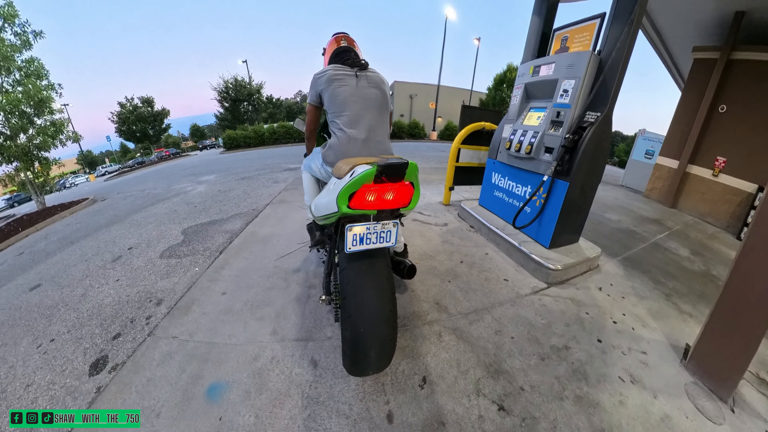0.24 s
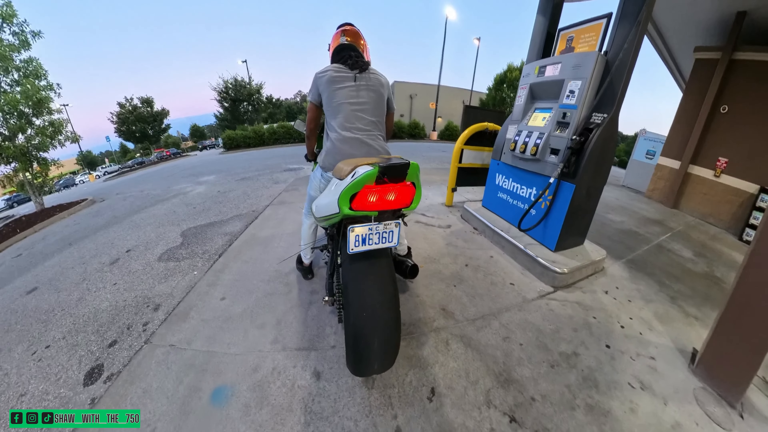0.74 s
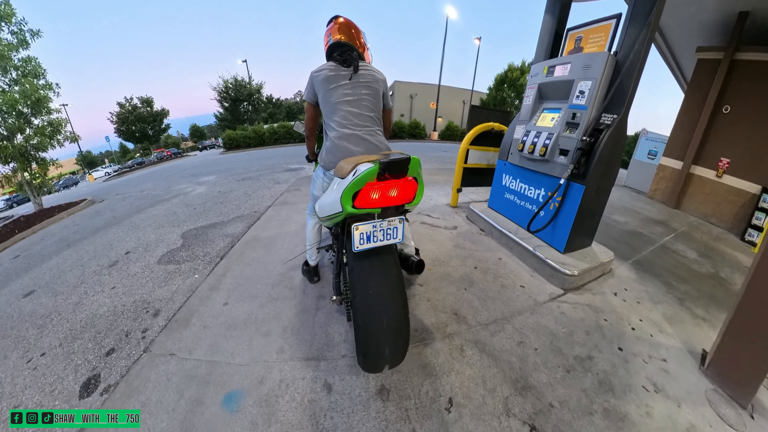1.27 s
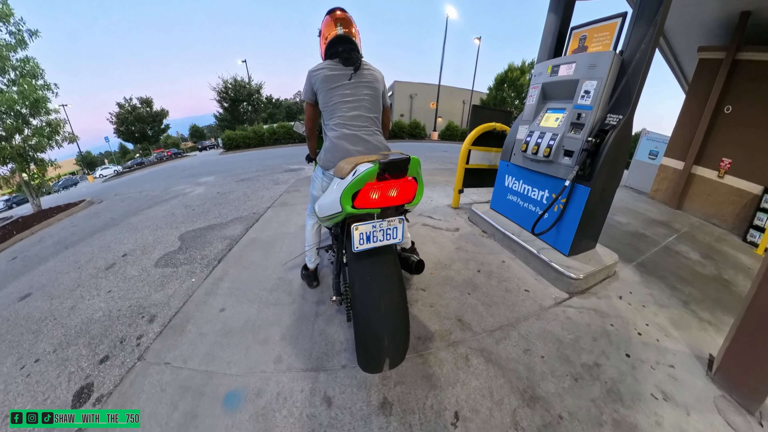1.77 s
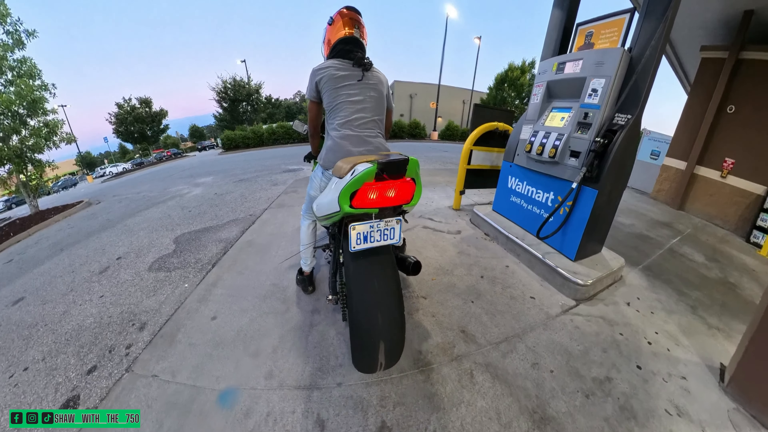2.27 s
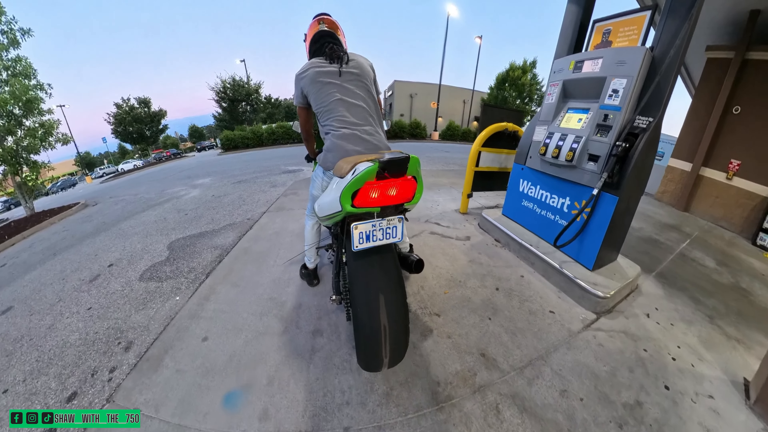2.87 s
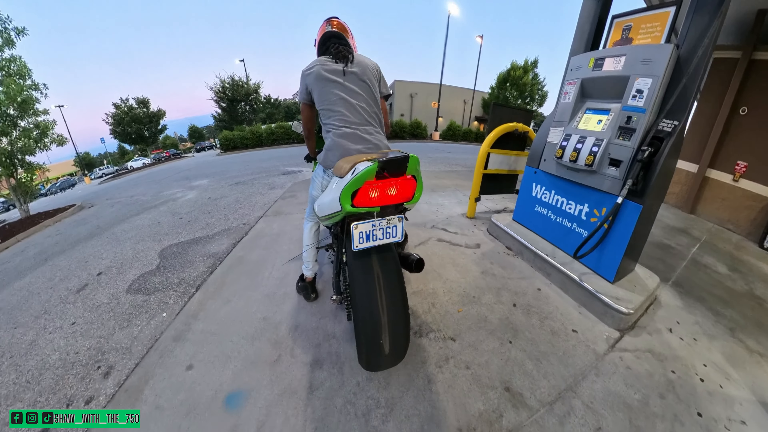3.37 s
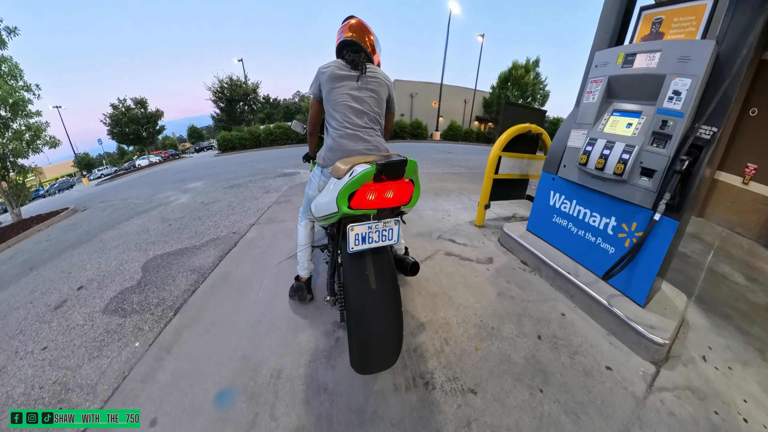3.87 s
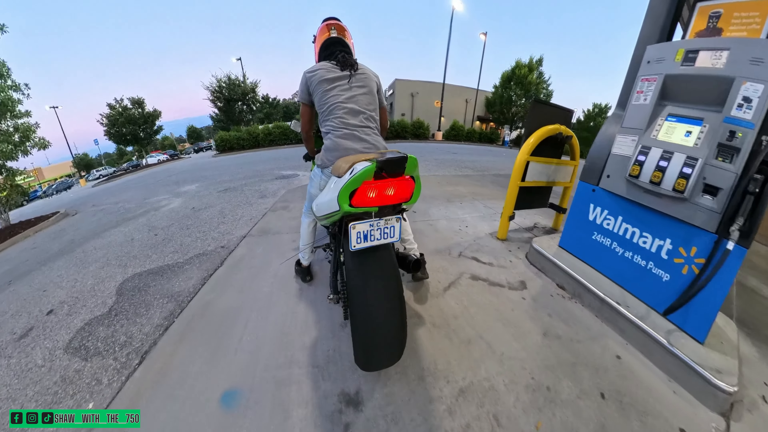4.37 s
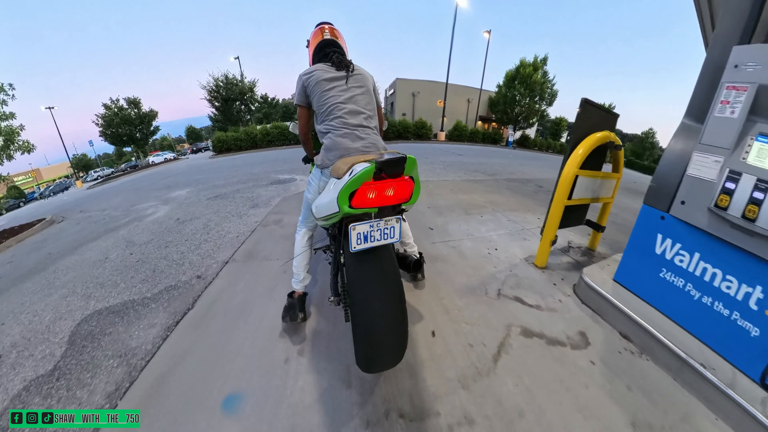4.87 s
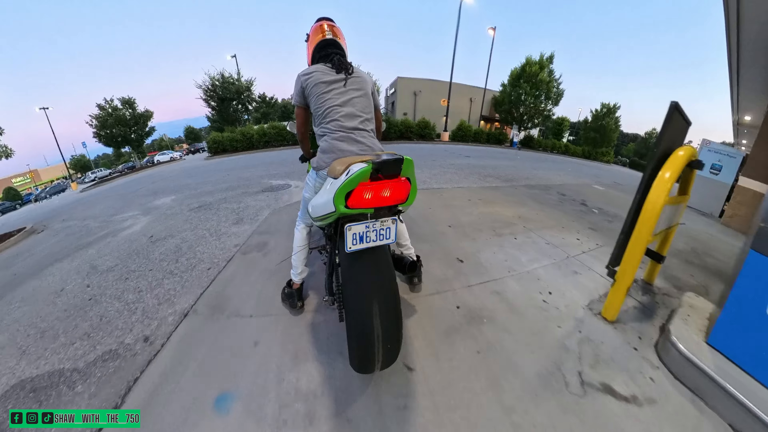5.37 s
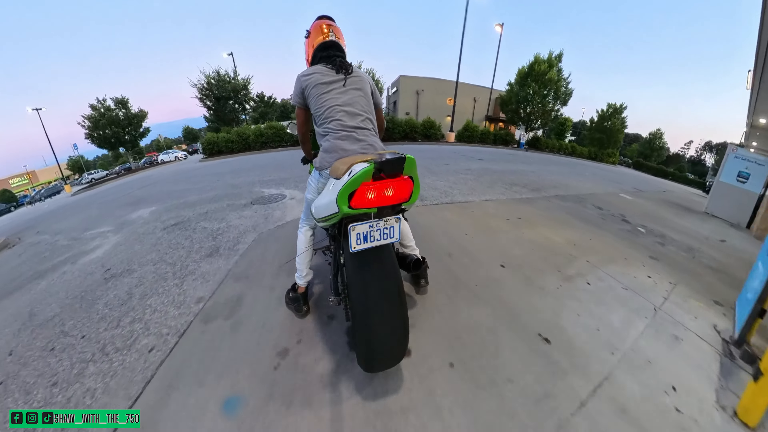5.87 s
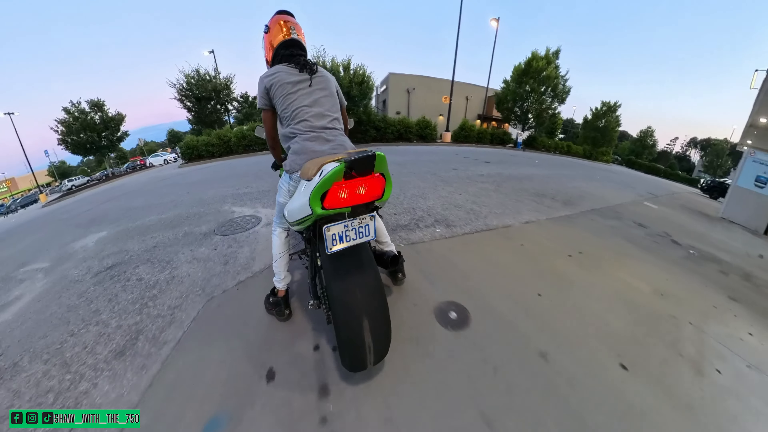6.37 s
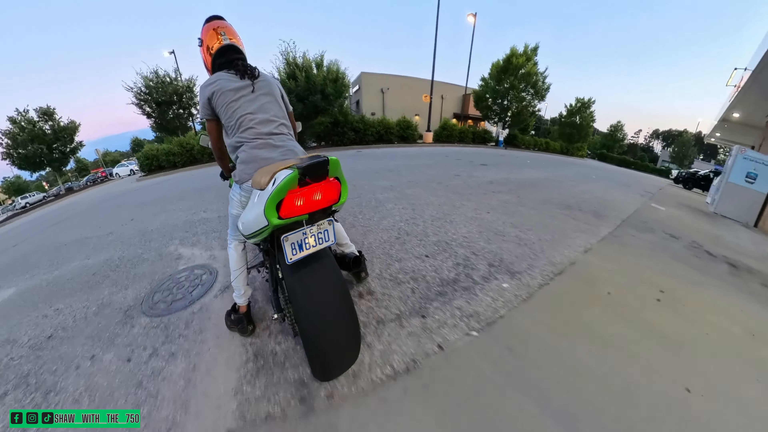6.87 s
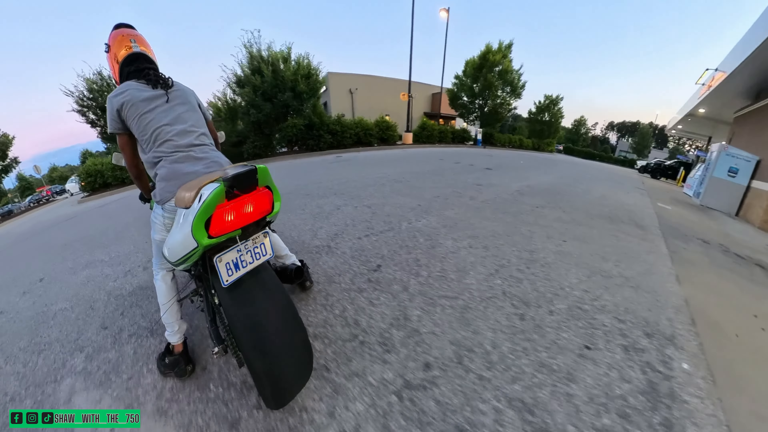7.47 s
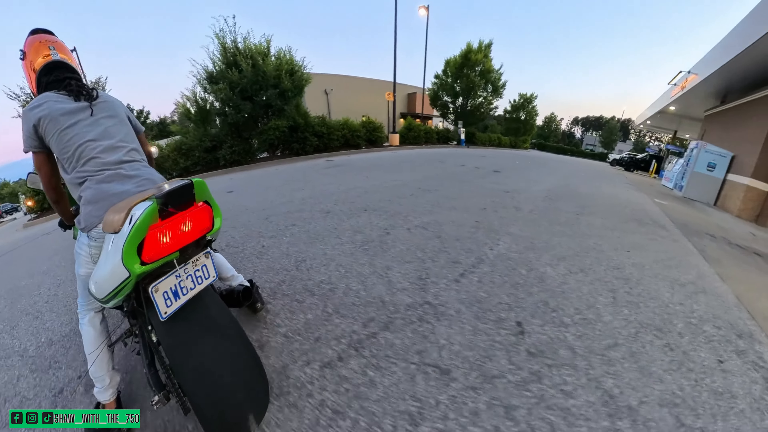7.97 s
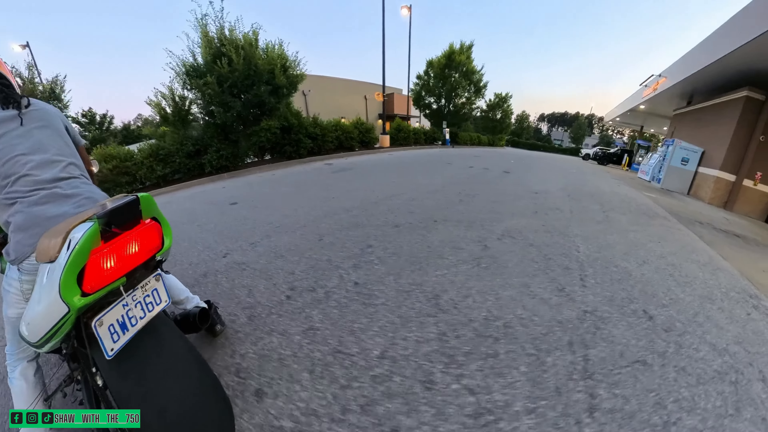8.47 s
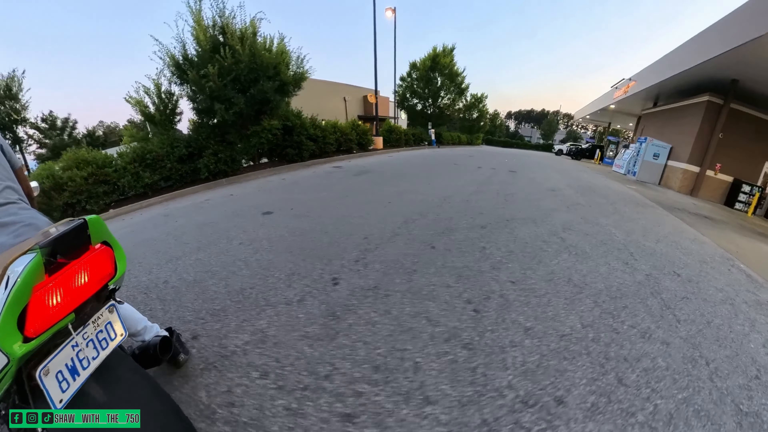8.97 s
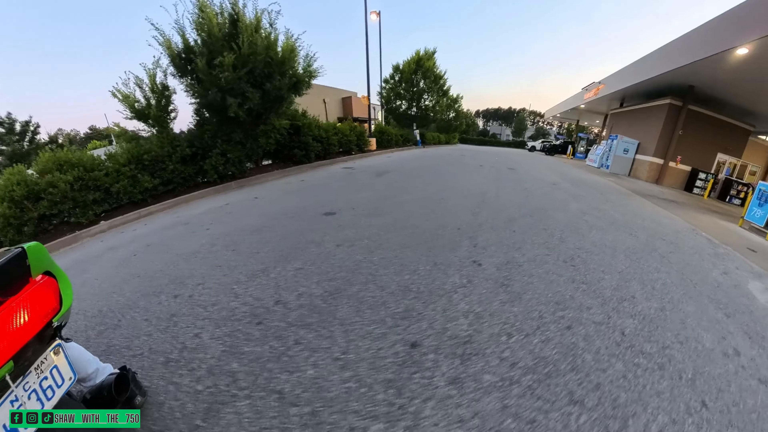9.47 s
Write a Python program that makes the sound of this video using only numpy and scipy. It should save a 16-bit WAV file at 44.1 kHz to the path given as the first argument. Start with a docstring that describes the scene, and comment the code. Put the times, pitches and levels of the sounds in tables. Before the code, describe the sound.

Close behind a motorcycle: low throaty idle, metallic gear clunk, one quick rev, then a slow, sagging, chain-knocking roll-off with two soft throttle swells.

```python
"""A four-cylinder motorcycle idles on a roofed forecourt, the microphone a fixed distance behind its tail.
Fittings clink as it clunks into gear; a blip of throttle follows and the clutch, slipping, drags the revs down.
It creeps past a fuel pump, lugging and stumbling between two gentle pulls, and rolls out from under the roof.
Throughout, firings ring the silencer, gas rasps and growls, valves and gears clatter over intake hiss and faint
open air; at low revs the slack chain knocks. Pulses and noise are coloured by resonant bodies and struck modes."""
import sys
import numpy as np
from scipy import signal
from scipy.fft import rfft, irfft
from scipy.io import wavfile
from scipy.ndimage import uniform_filter1d

SR = 44100
rng = np.random.default_rng(int(sys.argv[2]) if len(sys.argv) > 2 else 0)


def int16_out(signal):
    """Quantize to a 16-bit WAV file."""
    q = np.round(np.clip(np.atleast_2d(signal).T, -1, 1) * 32767)
    wavfile.write(sys.argv[1], SR, q.astype(np.int16))


N = 429093
TIME = np.arange(N) / SR

# speed with the throttle shut, before hunting, dragged down as the clutch bites [t/s, firing rate f/Hz]
IDLE = [(0.22, 53.85), (0.29, 52.08), (0.5, 49.92), (0.66, 43.36), (0.9, 46.39), (1.2, 47), (1.41, 43.74),
        (2.15, 40.6), (2.29, 39.33), (2.6, 36.5), (2.9, 37.53), (3.18, 35.72), (3.34, 36.95), (3.69, 37.08),
        (4.04, 32.63), (4.3, 30.26), (4.7, 28.51), (5.3, 28.84), (6.9, 30.15), (7.25, 31.99), (7.6, 31.93),
        (8.8, 37.93), (9.55, 38.65), (9.72, 42.9)]
# twists of the throttle: one blip, two pulls [t/s, rise/s, top firing rate f/Hz, fall/s, force 0-1]
TWISTS = [(1.435, 0.145, 110.5, .222, 0.9), (5.3, .672, 67, .16, 0.46), (7.581, .872, 56.1, .149, 0.17)]
# stumbles: the firings go soft for a moment, about once an engine cycle when lugging [t/s, depth/dB]
STUMBLES = [(.595, -3), (1.375, -3.5), (2.075, -3.5), (4.415, -7.5), (4.555, -6), (4.706, -3), (4.858, -8),
            (5.015, -6.5), (5.095, -3.5), (5.172, -5), (5.329, -12), (5.461, -1), (6.15, -3), (6.42, -2.5),
            (6.501, -8), (6.648, -6.5), (6.789, -7.5), (6.93, -4.5), (7.05, -5), (7.206, -3.5),
            (7.568, -3.5)]
# the four cylinders in firing order [relative strength/dB, lateness/firing periods, header pipe f/Hz]
CYLINDERS = [(7, 0.0046, 135.4), (4, -0.0058, 219.3), (5, 0.014, 180.6), (3.5, -0.0031, 198)]
# firing rates: easy walking pace; below which the chain hangs slack; where the flow turns slow to fast
CRUISE_HZ, SLACK_BELOW_HZ = 39.5, 33.7
SLOW_FLOW_HZ, FAST_FLOW_HZ = 44.4, 58
# how each voice follows the work
# [cruise level/dB, speed/(dB per octave), full throttle/dB, overrun/dB, lugging/dB]
BOOM_LAW = (-17.5, 0.5, 7.5, 0.5, -0.4)
RASP_LAW = (-33.5, 6, 1.5, -2.5, -2.5)
CLATTER_LAW = (-41, 1, 4, -2, -2)
INTAKE_LAW = (-65.5, 10.5, -19, 7, 3)

# response of pipe and silencer to one firing in slow flow [f/Hz, level/dB]
PIPE = [(18, -34), (30, -6.5), (44, 5), (60, 7.5), (76, 3), (96, -1.5), (118, 2.5), (134, -4.5), (152, 5.5),
        (188, -3), (245, -13.5), (300, -3.5), (355, -34), (650, -41.5)]
# the same once the gas flows fast [f/Hz, level/dB]
FAST_PIPE = [(25, -26.5), (42, -4.5), (57, 4.5), (68, 1.5), (92, -4), (113, -4.5), (133, -3), (165, -5),
             (183, -4.5), (198, -12.5), (225, -12), (260, -13), (285, -11), (327, -9.5), (358, -21.5),
             (395, -19.5), (450, -33), (650, -48.5)]
# standing waves that hold the sound back inside the silencer [f/Hz, width/Hz]
CHAMBERS = [(66, 57), (167, 34.2), (278, 43)]
# what passes from the headers to the tailpipe [f/Hz, level/dB]
MANIFOLD = [(70, -7), (120, 1.5), (240, 2), (340, -9)]
# breathy gas leaving the tailpipe [f/Hz, level/dB]
GAS = [(120, -1.5), (300, -3), (365, -8), (480, 1.5), (640, -9), (745, -5.5), (870, -11), (1000, -20),
       (1600, -25.5), (5000, -58)]
# the clean bark of the tailpipe at higher revs [f/Hz, level/dB]
BARK = [(180, -8), (280, 3.5), (330, 3.5), (360, -10.5), (405, 0.5), (470, 2.5), (540, -2.5), (610, -5.5),
        (680, -1.5), (770, -7.5), (880, -6.5), (1000, -16.5), (1350, -10), (2000, -26.5)]
# turbulent gas under load [f/Hz, level/dB], and the throttle force at which it is fully grown
GROWL = [(170, 1), (260, 1), (330, -1), (380, -5.5), (480, -4), (620, -5.5), (800, -15.5), (1000, -21),
         (1350, -16.5), (2000, -24)]
FULL_LOAD = .42
# echo off the fuel pump as the bike rolls past, end values held [t/s, strength 0-1, delay/s]
PUMP = [(3.0, 0.33, 0.0053), (4.1, 0.6, 0.005), (4.9, 0.36, 0.005166), (5.5, 0.4, 0.005)]

# engine cases, valve gear and gears [f/Hz, level/dB]
CASES = [(500, -12), (1000, -8), (1300, -0.5), (1600, -3), (1950, -1.5), (2300, -3.5), (3300, -5.5),
         (4300, -10.5), (5500, -18.5), (7500, -26), (10500, -39.5), (13000, -58)]
# ringing covers and heat shields [f/Hz, width/Hz, level/dB]
COVERS = [(1222, 79, -0.5), (1440, 50, -6), (1770, 49, -5), (1965, 87, -5.5), (2850, 82, -11),
          (3330, 94, -5.5), (5500, 200, -5.5)]
# colour of a bright metal tick, valve tip or chain link [f/Hz, level/dB]
TAPPETS = [(3500, -8.5), (6500, 0), (9000, -7.5), (12000, -17.5)]

# the slack chain slapping its guides [t/s, level/dB, ring f/Hz]
KNOCKS = [(4.305, -41, 1301), (4.369, -40, 1700), (4.47, -39, 1477), (4.579, -46, 1928), (4.685, -45, 1320),
          (4.727, -45, 2584), (4.762, -43, 1623), (4.799, -43, 1320), (4.883, -44, 1481),
          (4.912, -41, 1747), (4.955, -50, 1440), (5.038, -47, 1214), (5.073, -41.5, 1842),
          (5.112, -57, 1238), (5.198, -46, 2067), (5.231, -37, 1960), (5.268, -48, 1430),
          (5.355, -41, 1600), (5.385, -37, 1284), (5.414, -39.5, 1440), (5.479, -39, 1273),
          (6.305, -45, 1500), (6.392, -40, 1711), (6.422, -38, 1330), (6.557, -46, 2029),
          (6.669, -42, 1263), (6.701, -41, 1200), (6.846, -47, 1622), (6.884, -43, 1569),
          (7.088, -37.5, 1970), (7.217, -40, 2108), (7.246, -41, 1240), (7.341, -39, 1276),
          (7.371, -42, 1992), (7.436, -42, 1169), (7.532, -45, 1180)]
# colour of a chain knock [f/Hz, level/dB]
CHAIN = [(500, 6.5), (1300, -2), (2100, 1), (3500, -7.5), (5500, -19), (8500, -24), (12000, -48)]
# chain links clicking onto the sprocket [t/s, level/dB]
LINKS = [(4.731, -53), (4.763, -51), (4.911, -51), (4.956, -48), (5.232, -47), (5.388, -49), (5.509, -51),
         (6.225, -54), (6.489, -55), (6.67, -54), (6.701, -54), (6.815, -46)]

# first gear feeling its way in, then engaging [t/s, strike level/dB]
SHIFTS = [(.412, -27), (.443, -28), (.515, -31), (.545, -37), (.575, -23.5)]
# the gearbox ring [f/Hz, level/dB, t60/s]
GEARBOX = [(720, -0.5, 0.16), (681, -8, 0.11), (896, -1.5, 0.043), (1290, -20, .06)]
# loose metal fittings clinking [t/s, level/dB, centre of brightness f/Hz, decay/s, scrape against ring 0-1]
CLINKS = [(0.401, -44, 3080, 0.031, .8), (.432, -55, 6700, 0.025, .5), (.436, -37.5, 2100, 0.12, 1),
          (.495, -60, 7900, 0.02, .1), (.603, -34, 2270, 0.04, 0.2), (.604, -39.5, 4370, 0.052, 0.5),
          (.645, -41, 3860, 0.086, 1), (.713, -43, 2856, 0.045, .5), (0.714, -44.5, 4430, 0.04, 0.7),
          (1.32, -45, 2099, 0.094, 0.94), (1.409, -42, 2800, 0.062, 1), (1.468, -41, 3670, 0.022, 1),
          (6.816, -55, 7406, 0.025, 0.72), (6.817, -38, 2078, 0.015, .8), (6.968, -35.5, 2370, 0.022, 1),
          (6.973, -41, 3997, 0.016, 1)]
# their ring [f/Hz, level/dB, t60/s]
FITTINGS = [(2230, 6, 0.032), (2296, 13, 0.032), (2780, 12.5, 0.034), (3460, -20, .02), (4130, -4, 0.017),
            (4760, -9, 0.027), (5230, -13, 0.012), (6700, -7, .02), (7250, -11, .02), (7860, -15, 0.027)]
# air hissing past the nearly shut throttle plates [f/Hz, level/dB]
INTAKE = [(1500, -10.5), (2600, -2), (4300, 2.5), (5600, -6), (7500, -19), (11000, -32.5)]
# distant traffic and air, heard as one noise [f/Hz, level/dB]
AIR = [(15, -11.5), (60, -6), (200, -3.5), (400, -10), (2000, -34), (8000, -60.5)]


def undb(db):
    """Decibels to gain."""
    return 10 ** (np.asarray(db) / 20)


def curves(table):
    """The columns of a timed table, one value per sample."""
    s, *columns = np.transpose(table)
    return [np.interp(TIME, s, c) for c in columns]


def unit(x):
    """Scale to rms 1."""
    return x / np.sqrt(np.mean(x ** 2) + 1e-18)


def smooth(x, seconds):
    """Two moving averages in a row."""
    size = int(seconds * SR)
    return uniform_filter1d(uniform_filter1d(x, size), size)


def running_rms(x, seconds):
    """Smooth local level."""
    return np.sqrt(np.abs(smooth(x ** 2, seconds)) + 1e-18)


def body(x, points, size=16384):
    """Pass x through a causal, minimum-phase resonant body with the given (Hz, dB) response."""
    hz, db = np.transpose(points)
    log_hz = np.log(np.maximum(np.fft.rfftfreq(size, 1 / SR), 1))
    above = np.maximum(log_hz - np.log(hz[-1]), 0)
    below = np.maximum(np.log(hz[0]) - log_hz, 0)
    log_gain = np.log(undb(np.interp(log_hz, np.log(hz), db)))
    # beyond the end points the response falls 12 dB per octave
    cepstrum = irfft(log_gain - 2 * (above + below))
    # folding the cepstrum forward makes the response causal
    cepstrum[1:size // 2] *= 2
    cepstrum[size // 2 + 1:] = 0
    response = irfft(np.exp(rfft(cepstrum)))[:size // 2]
    return signal.fftconvolve(x, response)[:N]


def resonate(x, hz, width_hz):
    """One resonance of the given width."""
    return signal.lfilter(*signal.iirpeak(hz, hz / width_hz, fs=SR), x)


def impulses(times, sizes):
    """One impulse at each time."""
    return np.bincount(np.clip(times * SR, 0, N).astype(int), sizes, N + 1)[:N]


def fade(x, seconds):
    """Give each impulse an exponential tail."""
    return signal.lfilter([1], [1, -np.exp(-1 / (seconds * SR))], x)


def ring(modes, t):
    """Struck modes (Hz, dB, t60) over the times t, each dying exponentially."""
    return sum(undb(db) * np.sin(2 * np.pi * hz * t) * np.exp(-np.log(1000) * t / t60)
               for hz, db, t60 in modes)


def revs(fall_shape=1.4, opening_shape=2.9, shut_s=0.04):
    """Firing rate, throttle and overrun: each twist eases the revs up from idle, then they coast back down."""
    idle = curves(IDLE)[0] * hunting()
    hz, throttle, overrun = idle, 0, 0
    for s, rise_s, top_hz, fall_s, force in TWISTS:
        rising = np.clip((TIME - s) / rise_s, 0, 1)
        since_top = np.maximum(TIME - s - rise_s, 0)
        coasting = np.exp(-(since_top / fall_s) ** fall_shape)
        hz = hz + (top_hz - idle) * np.sin(np.pi / 2 * rising) ** 2 * coasting
        throttle = throttle + force * np.sin(np.pi * rising ** opening_shape)
        overrun = overrun + coasting * (1 - np.exp(-since_top / shut_s))
    return hz, throttle, overrun


def hunting(share=.008, wander_s=0.1643):
    """The idle never holds quite still: a slow random factor on the speed."""
    return 1 + share * unit(smooth(rng.standard_normal(N), wander_s))


def falter(width_s=0.023):
    """The strength lost around each stumble, in dB (negative)."""
    return sum(db * np.exp(-((TIME - s) / width_s) ** 2) for s, db in STUMBLES)


def lugging(memory_s=0.63, full_db=-1.23):
    """How close the engine is to stalling, 0-1: the strength lost in the stumbles around each moment."""
    return np.clip(smooth(falter(), memory_s) / full_db, 0, 1)


def effort(law, hz, throttle, overrun):
    """Level of one voice in dB, following speed, throttle, overrun and lugging by its law."""
    cruise_db, octave_db, throttle_db, overrun_db, lug_db = law
    speed_db = octave_db * np.log2(hz / CRUISE_HZ)
    return cruise_db + speed_db + throttle_db * throttle + overrun_db * overrun + lug_db * lugging()


def exhaust(hz, throttle, boom_db, gas_db, bark_hz=48, puff_s=0.054, leak=1.0, gas_loss=0.38):
    """Each firing rings the silencer and lets out a puff of gas."""
    times, strength = firings(hz, throttle)
    pulses = impulses(times, strength)
    boom = silencer(pulses, headers(times, strength), hz)
    # at higher revs the gas leaves as a clean bark, at idle as a breathy puff
    bark = scatter(body(pulses, BARK))
    rasp = body((fade(pulses, puff_s) + leak) * rng.standard_normal(N), GAS)
    bark_share = np.clip(0.58 * (hz / bark_hz) ** 2, 0, .85)
    gas = np.sqrt(bark_share) * bark / running_rms(bark, 0.14)
    gas = gas + np.sqrt(1 - bark_share) * rasp / running_rms(rasp, 0.12)
    return boom * undb(boom_db) + gas * undb(gas_db + gas_loss * falter())


def firings(hz, throttle, idle_hz=37, load_roughness=0.41, size=1024):
    """Times and strengths of the firings: uneven at low revs and under load, late in a stumble."""
    lost_db = falter()
    slowing = .015 * (lost_db - uniform_filter1d(lost_db, SR // 4))
    phase = np.cumsum(hz * (1 + slowing)) / SR
    k = np.arange(int(phase[-1]))
    jitter, scatter_db = (rng.standard_normal((size, 2))[k] * [.01, .75]).T  # firing periods, dB
    cylinder_db, late, _ = np.array(CYLINDERS)[k % len(CYLINDERS)].T
    roughness = np.clip(idle_hz / hz, .8, 1) ** 1.3 + load_roughness * throttle
    uneven = np.interp(k, phase, roughness)
    times = np.interp(k + uneven * (late + jitter), phase, TIME)
    return times, undb(uneven * (cylinder_db + scatter_db))


def deep_bass(x):
    """The part below 100 Hz."""
    return signal.sosfiltfilt(signal.butter(2, 100, fs=SR, output="sos"), x)


def silencer(pulses, burble, hz, burble_db=-11.0, fast_burble_db=-3, thinning=0.72, bass_loss=0.52):
    """The boom: burbling at idle, fuller at fast flow; a stumble takes its edge and half spares the bass."""
    flow = np.clip((hz - SLOW_FLOW_HZ) / (FAST_FLOW_HZ - SLOW_FLOW_HZ), 0, 1)
    slow, fast = body(pulses, PIPE), body(pulses, FAST_PIPE)
    # slow firings are long and carry more bass than quick ones
    slow = slow - thinning * np.clip(np.log2(hz / 39), -1, .4) * deep_bass(slow)
    boom = disperse((1 - flow) * slow / running_rms(slow, 0.33) + flow * fast / running_rms(fast, 0.13))
    burble_gain = undb(burble_db + fast_burble_db * flow)
    boom = boom / running_rms(boom, .08) + burble_gain * burble / running_rms(burble, 0.2)
    bass, lost_db = deep_bass(boom), falter()
    return bass * undb(bass_loss * lost_db) + (boom - bass) * undb(lost_db)


def headers(times, strength, width_hz=24, scatter_db=4, size=1024):
    """Each cylinder rings its own header pipe, never twice alike: the burble between the firing tones."""
    blow = strength * undb(scatter_db * rng.standard_normal(size)[:len(times)])
    count, burble = len(CYLINDERS), 0
    for k, (_, _, hz) in enumerate(CYLINDERS):
        blows = impulses(times[k::count], blow[k::count])
        burble = burble + resonate(body(blows, MANIFOLD), hz, width_hz)
    return burble


def disperse(x):
    """All-pass chambers delay the tones near their own pitch, so one firing rolls on into the next."""
    for hz, width in CHAMBERS:
        radius = np.exp(-np.pi * width / SR)
        poles = [1, -2 * radius * np.cos(2 * np.pi * hz / SR), radius ** 2]
        x = signal.lfilter(poles[::-1], poles, x)
    return x


def scatter(x, seconds=0.012):
    """Ground, tyre and bodywork return many small echoes: the tones stay, the edges blur."""
    t = TIME[:SR // 4]
    echoes = rfft(rng.standard_normal(len(t)) * np.exp(-t / seconds))
    # keep only the phases, so no tone gains on another
    return signal.fftconvolve(x, irfft(echoes / np.abs(echoes))[:len(t) // 2])[:N]


def growl(hz, throttle, growl_db=-33, lag_s=.09, puff_s=0.0081):
    """Under load the gas leaves in turbulent puffs, one a firing, swelling a little behind the throttle."""
    since_firing = (np.cumsum(hz) / SR % 1) / hz
    load = np.minimum(np.interp(TIME - lag_s, TIME, throttle) / FULL_LOAD, 1)
    puffs = np.exp(-since_firing / puff_s) * rng.standard_normal(N)
    return undb(growl_db) * load * unit(body(puffs, GROWL))


def pump_echo(x, lowest_hz=150):
    """The pump's flat side returns the exhaust a moment later, colouring it; the deep bass bends round it."""
    strength, delay_s = curves(PUMP)
    thrown = signal.sosfiltfilt(signal.butter(3, lowest_hz, "high", fs=SR, output="sos"), x)
    echo = strength * np.interp(TIME - delay_s, TIME, thrown)
    return (x + echo) / np.sqrt(1 + 1.1 * strength ** 2)


def clatter(hz, clatter_db, tick_s=0.0064, tick_scatter_db=3.0, whirr=1.0, size=4096, count=4):
    """Valves tick several times a firing over the whirr of gears and cam chain, all through the cases."""
    phase = count * np.cumsum(hz) / SR
    k = np.arange(int(phase[-1]))
    late, strength = rng.standard_normal((size, 2))[k].T
    times = np.interp(k + 0.15 * late, phase, TIME)
    # the tick that falls on a firing is on average the hardest
    ticks = impulses(times, undb(tick_scatter_db * strength - 6.3 * (k % count > 0)))
    # the whirr fills in between the ticks as the revs rise
    drive = (whirr * (hz / 38) ** 2 + fade(ticks, tick_s)) * rng.standard_normal(N)
    cases = body(drive / running_rms(drive, 0.089), CASES)
    cases = cases + sum(undb(db) * resonate(cases, f, width) for f, width, db in COVERS)
    return unit(cases) * undb(clatter_db)


def tappets(hz, clatter_db, below_db=-25.5, tick_s=0.0028, scatter_db=5, count=2, size=2048):
    """The valve tips add thin, bright ticks of uneven strength, two to a firing."""
    phase = count * np.cumsum(hz) / SR
    k = np.arange(int(phase[-1]))
    late, strength = rng.standard_normal((size, 2))[k].T
    times = np.interp(k + .1 * late, phase, TIME)
    ticks = impulses(times, undb(scatter_db * np.clip(strength, -2, 1.6)))
    bright = body(fade(ticks, tick_s) * rng.standard_normal(N), TAPPETS)
    return unit(bright) * undb(clatter_db + below_db)


def canopy(x, leaves_s=6.6, leaving_s=1.2, from_hz=3000, under_db=0.0, open_db=-2):
    """The forecourt roof throws the clatter's treble back; out in the open it sounds duller."""
    treble = signal.sosfiltfilt(signal.butter(2, from_hz, "high", fs=SR, output="sos"), x)
    outside = np.clip((TIME - leaves_s) / leaving_s + .5, 0, 1)
    treble_db = under_db + (open_db - under_db) * outside
    return x + (undb(treble_db) - 1) * treble


def chain(hz, knock_s=0.01, width_hz=380, ringing=2.3, ticks_per_s=12, tick_db=-48, tick_s=0.007, size=256):
    """The slack chain slaps its guides, each slap with its own ring; at low revs soft ticks fall at random."""
    t = TIME[:SR // 8]
    tick_times = np.cumsum(rng.exponential(size=size)) / ticks_per_s
    ticks = impulses(tick_times, np.full(size, undb(tick_db))) * (hz < SLACK_BELOW_HZ)
    grit = unit(body(rng.standard_normal(N), CHAIN))
    out = fade(ticks, tick_s) * grit
    for s, db, ring_hz in KNOCKS:
        span = slice(int(s * SR), int(s * SR) + len(t))
        slap = grit[span] * (1 - np.exp(-t / 0.0011)) * np.exp(-t / knock_s)
        slap = slap + ringing * resonate(slap, ring_hz, width_hz)
        # the listed level is that of the first eightieth of a second
        out[span] += undb(db) * slap / np.sqrt(np.mean(slap[:SR // 80] ** 2))
    return out


def links(click_s=0.0012, rattle_s=.015, rattle_db=-12):
    """A link seats on the sprocket with a bright click and a short rattle."""
    s, db = np.transpose(LINKS)
    hits = impulses(s, undb(db))
    envelope = fade(hits, click_s) + undb(rattle_db) * fade(hits, rattle_s)
    return envelope * unit(body(rng.standard_normal(N), TAPPETS))


def gear_shift():
    """The gear dogs meet and ring the gearbox."""
    s, db = np.transpose(SHIFTS)
    return signal.fftconvolve(impulses(s, undb(db)), ring(GEARBOX, TIME[:SR // 2]))[:N]


def clinks(spread_octaves=0.3, contacts_per_s=420):
    """Each clink is a dying chatter of contacts that scrapes and rings the metal around one pitch."""
    out, t = np.zeros(N), TIME[:SR // 2]
    for s, db, centre_hz, decay_s, scrape in CLINKS:
        # the further a mode lies from the centre, the weaker it rings
        modes = [(hz, mode_db - 6 * (np.log2(hz / centre_hz) / spread_octaves) ** 2, t60)
                 for hz, mode_db, t60 in FITTINGS]
        contacts = (rng.random(len(t)) < contacts_per_s / SR) | (t == 0)
        roughness = 0.23 + fade(1. * contacts, 0.0025)
        chatter = rng.standard_normal(len(t)) * roughness * np.exp(-t / decay_s)
        rung = signal.fftconvolve(chatter, ring(modes, t))[:len(t)]
        scrape_band = signal.butter(4, [0.43 * centre_hz, 1.17 * centre_hz], "band", fs=SR)
        scraped = signal.lfilter(*scrape_band, chatter)
        clink = unit(rung) + scrape * unit(scraped)
        start = int(s * SR)
        out[start:start + len(t)] += undb(db) * clink / running_rms(clink, 0.013).max()
    return out


def intake_hiss(intake_db):
    """Air hisses past the throttle plates: coloured noise, softer as they open."""
    return undb(intake_db) * unit(body(rng.standard_normal(N), INTAKE))


def open_air(air_db=-35):
    """Distant traffic and air: faint, steady, low-pitched noise."""
    return undb(air_db) * unit(body(rng.standard_normal(N), AIR))


def scene(pump_clatter_db=4.0, gas_lag_s=0.025, unloading=0.44):
    """The bike at a fixed distance; gears unload in a stumble, the pump throws back clatter."""
    hz, throttle, overrun = revs()
    boom_db, clatter_db, intake_db = (effort(law, hz, throttle, overrun)
                                      for law in (BOOM_LAW, CLATTER_LAW, INTAKE_LAW))
    # the gas follows the throttle a moment late
    late_throttle, late_overrun = (np.interp(TIME - gas_lag_s, TIME, x) for x in (throttle, overrun))
    gas_db = effort(RASP_LAW, hz, late_throttle, late_overrun)
    near_pump, _ = curves(PUMP)
    pipe = pump_echo(exhaust(hz, throttle, boom_db, gas_db) + growl(hz, throttle))
    gears_db = clatter_db + unloading * falter() + pump_clatter_db * near_pump
    works = canopy(clatter(hz, gears_db) + tappets(hz, clatter_db))
    drive = chain(hz) + links() + gear_shift()
    return (pipe + works + drive + clinks() + intake_hiss(intake_db) + open_air())[None]


def record(dry, ceiling=1.0, threshold_db=-16, squeeze=0.51, window_s=0.043, top_hz=11800):
    """The recorder turns itself down when the sound swells, rounds the tallest peaks and cuts the top."""
    gain = np.minimum(undb(threshold_db) / running_rms(dry[0], window_s), 1) ** squeeze
    rounded = ceiling * np.tanh(gain * dry / ceiling)
    return signal.sosfilt(signal.ellip(8, .2, 70, top_hz, fs=SR, output="sos"), rounded)


dry = scene()
out = record(dry)
int16_out(out)
```